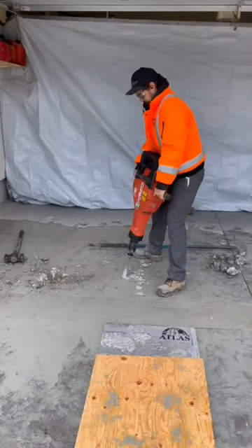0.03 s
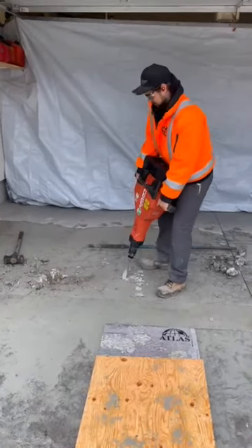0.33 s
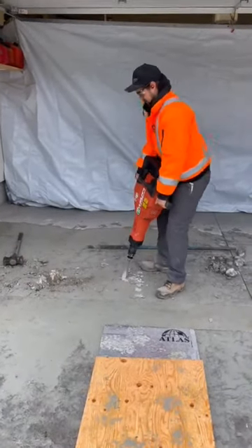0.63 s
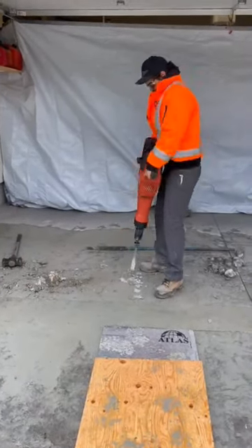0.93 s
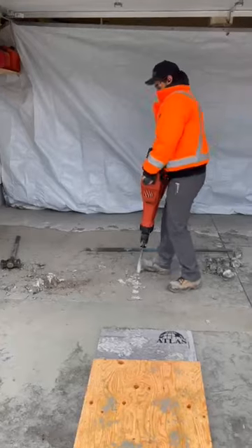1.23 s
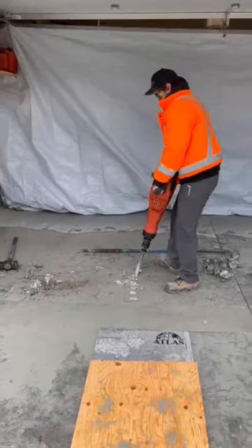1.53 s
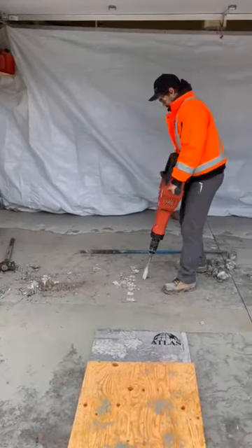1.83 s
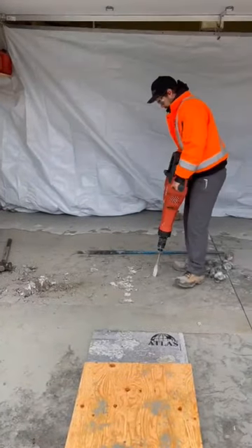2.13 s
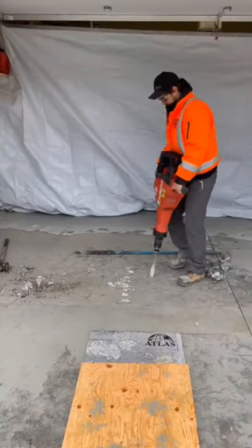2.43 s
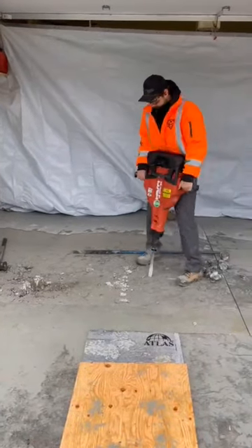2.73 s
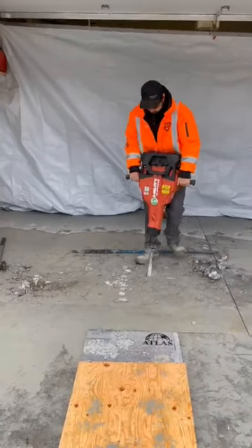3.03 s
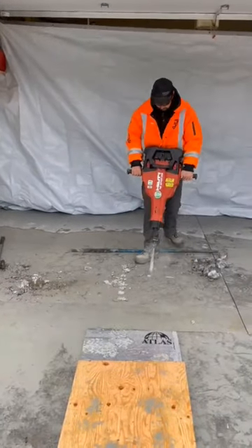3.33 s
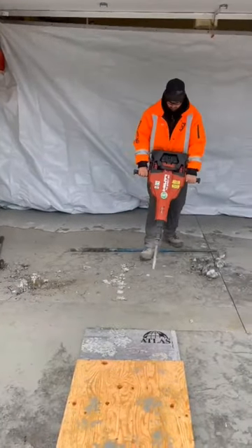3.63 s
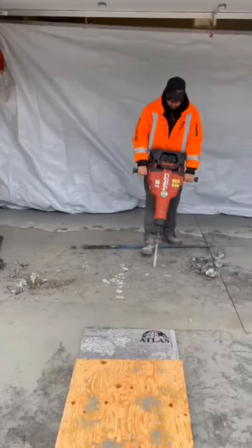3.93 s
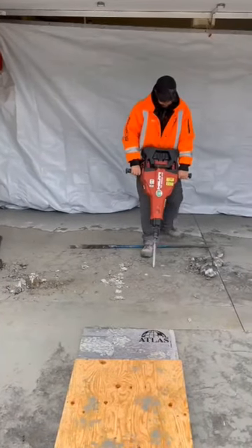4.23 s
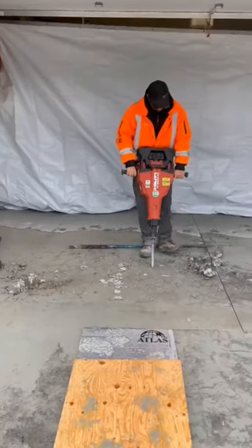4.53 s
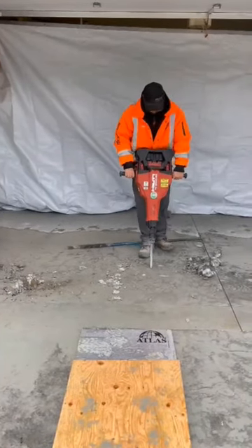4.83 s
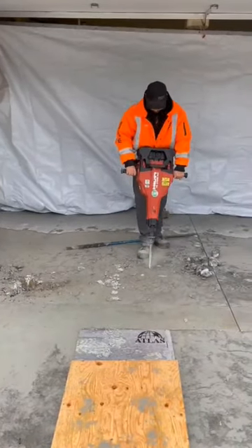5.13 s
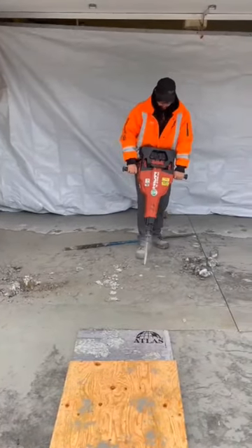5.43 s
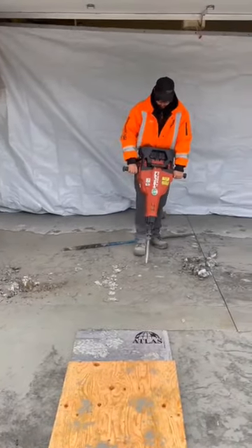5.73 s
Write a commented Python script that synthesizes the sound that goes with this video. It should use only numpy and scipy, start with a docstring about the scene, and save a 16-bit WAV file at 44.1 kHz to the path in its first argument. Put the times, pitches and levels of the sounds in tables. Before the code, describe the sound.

An electric jackhammer idles in a garage, its motor and cooling fan making a steady high whine and airy rush. About three seconds in, it hammers the concrete in a very short, loud burst of thumps, cracks and ringing steel. The idle continues slightly louder, and a second burst follows two seconds later. The whine sags during each burst. A faint draught rumbles on the microphone.

```python
"""An electric jackhammer breaks concrete in a garage, in two bursts of about 29 blows a second.
Each blow is an impulse that thumps the housing and slab, cracks the concrete and rings the chisel's modes;
the room reverberates. The motor and its cooling fan whine throughout, sagging under load whenever the
chisel is pressed onto the floor. A draught buffets the microphone."""
import sys
import numpy as np
from scipy import signal
from scipy.fft import rfft, irfft
from scipy.io import wavfile

SR = 44100
rng = np.random.default_rng(int(sys.argv[2]) if len(sys.argv) > 2 else 0)


def master(y):
    """Save y as 16-bit WAV."""
    cut = np.clip(np.atleast_2d(y).T, -1, 1)
    pcm = np.round(cut * 32767)  # scale
    wavfile.write(sys.argv[1], SR, pcm.astype(np.int16))


N = 264600
TIME = np.arange(N) / SR


def gain_of(db):
    """Amplitude ratio of a level in decibels."""
    return 10 ** (np.asarray(db) / 20)


def unit_rms(x):
    """Normalisation to rms 1."""
    return x / np.sqrt(np.mean(x ** 2) + 1e-20)


def levelled(x, db, size=1100):
    """Normalisation of a sound's onset to the given rms level."""
    return gain_of(db) * x / np.sqrt(np.mean(x[:size] ** 2))


def at_frequency(points, hz):
    """Interpolation along a logarithmic frequency axis."""
    f, value = np.transpose(points)
    return np.interp(np.log(hz + 1), np.log(f), value)


def curves(rows):
    """Linear interpolation of each column of a time table, sample by sample."""
    s, *columns = np.transpose(rows)
    return [np.interp(TIME, s, c) for c in columns]


def add(mix, s, sound):
    """Superposition of a sound on the mix, starting at time s."""
    part = mix[round(s * SR):][:len(sound)]
    part += sound[:len(part)]


def colour(x, spectrum, size=4096):
    """Minimum-phase filtering: the response is causal, so attacks stay sharp."""
    log_gain = np.log(gain_of(at_frequency(spectrum, abs(np.fft.fftfreq(size, 1 / SR)))))
    taps = np.fft.ifft(np.exp(np.conj(signal.hilbert(log_gain)))).real
    return signal.fftconvolve(x, taps[:size // 2])[:len(x)]


def noise(spectrum):
    """Spectrally shaped Gaussian noise of rms 1."""
    return unit_rms(colour(rng.standard_normal(N), spectrum))


def wander(rate_hz):
    """Slow random fluctuation: low-pass noise of rms 1."""
    hz = np.fft.rfftfreq(N, 1 / SR)
    return unit_rms(irfft(rfft(rng.standard_normal(N)) / (1 + (hz / rate_hz) ** 4), N))


def tone(cycles, scatter, width_hz):
    """Line broadening: the walls scatter a share of a tone's power into a narrow band. Total rms 1."""
    swing = np.sqrt(1 - scatter) + np.sqrt(scatter / 2) * (wander(width_hz) + 1j * wander(width_hz))
    return unit_rms((swing * np.exp(2j * np.pi * (cycles + rng.random()))).real)


def draught():
    """Turbulent pressure at the microphone: gusts and a steadier flow add in power to a low rumble."""
    # steady flow: (time [s], level [dB])
    flow_levels = [(0, -58), (.9, -53.5), (1.9, -58.5), (2.45, -71), (3.0, -57.5), (4.2, -58), (6, -59)]
    # single gusts: (peak time [s], half-length [s], level [dB])
    gust_peaks = [(0.805, .05, -50.5), (0.934, 0.027, -45.5), (1.04, 0.017, -49), (1.21, .04, -57.5),
                  (2.948, 0.037, -52), (3.62, 0.03, -51), (3.684, 0.016, -45), (3.759, 0.012, -44),
                  (4.265, 0.014, -47), (4.355, .015, -50), (5.47, 0.029, -49)]
    # buffeting: (frequency [Hz], relative spectral level [dB])
    buffet_spectrum = [(20, -52), (30, -31), (38, -19), (50, -5), (80, -4), (135, -4.5), (200, -9.5),
                       (320, -11), (600, -21), (1500, -68.5), (6000, -100)]
    flow_db, = curves(flow_levels)
    flow = gain_of(flow_db + 3.43 * wander(14))
    gusts = sum(gain_of(db) * np.exp(-((TIME - s) / length) ** 2 / 2) for s, length, db in gust_peaks)
    return np.hypot(flow, gusts) * noise(buffet_spectrum)


def garage(x, patterns=3, size=24000):
    """Diffuse reverberation: each band decays at its own rate; echo patterns shift as the tool moves."""
    # reverberation time: (frequency [Hz], T60 [s])
    decay_times = [(100, 0.49), (500, 0.19), (2000, 0.22), (5000, .33), (8000, .28), (12000, 0.069)]
    out = np.zeros(N)
    for k in range(patterns):
        hz, t, bands = signal.stft(rng.standard_normal(size), SR, nperseg=256)
        decay = gain_of(-60 * t / at_frequency(decay_times, hz)[:, None])
        tail = signal.istft(bands * decay, SR, nperseg=256)[1]
        tail *= 1 - np.exp(-(np.arange(len(tail)) / SR / 0.019) ** 2)  # the echoes build up
        crossfade = np.sqrt(2 / patterns) * np.cos(np.pi * (4 * TIME + k / patterns))
        out += signal.fftconvolve(x * crossfade, tail / np.linalg.norm(tail))[:N]
    return out


def governor(idle_hz=2587, opening_excess_hz=138, sag_hz=85, settle_s=.8, load_edge_s=.04):
    """Speed regulation: sag under load, overshoot on release. Gives blade tone [Hz] and level dip [dB]."""
    # the tool is leant on: (press time [s], release time [s], overshoot of the blade tone [Hz])
    presses = [(3.06, 3.38, 63), (5.03, 5.42, 91)]
    # dip of the motor's noise in each press: (level change [dB])
    dips = [-3.5, -5.5]
    hz, dip_db = idle_hz + opening_excess_hz * np.exp(-TIME / settle_s), 0
    for (pressed, released, over_hz), db in zip(presses, dips):
        on, off = (.5 + .5 * np.tanh((TIME - s) / load_edge_s) for s in (pressed, released))
        overshoot = over_hz * off * np.exp(-abs(TIME - released) / settle_s)
        hz = hz - sag_hz * (on - off) + overshoot
        dip_db = dip_db + db * (on - off)
    return hz, dip_db


def motor(blades=9, gear_ratio=9):
    """Flow noise, blade-passing tones and shaft orders, with amplitude modulation by the piston."""
    # rush of the fan: (frequency [Hz], relative spectral level [dB])
    rush_spectrum = [(100, -10.5), (280, -0.5), (490, -1), (680, 3), (870, 4.5), (1050, 2), (1220, 5.5),
                     (1460, 6.5), (1620, 4.5), (1850, 5), (2200, 1), (2650, 1), (2850, -7), (4000, -51.5),
                     (9000, -96)]
    # hiss of the vents: (frequency [Hz], relative spectral level [dB])
    hiss_spectrum = [(2200, -39), (3000, -2.5), (3300, 1), (3650, -3.5), (4000, 1.5), (4300, -3), (4600, 1),
                     (4880, -6), (5150, 6), (5600, 3), (5920, 0.5), (6450, 4), (7100, -2), (7550, -1),
                     (7850, -5.5), (8200, -5), (8450, -58.5), (9500, -88)]
    # directivity, as the tool turns to face the listener: (time [s], rush level [dB], hiss level [dB])
    facing = [(0, -52, -51.5), (1.15, -51.5, -52), (2.1, -50, -51.5), (2.88, -48, -50), (3.5, -47, -44),
              (4.35, -46.5, -45.5), (4.9, -46, -45), (5.55, -45, -43.5), (6, -46.5, -43.5)]
    # the blade tone swells and fades as the tool moves: (time [s], level [dB])
    blade_levels = [(0, -57.5), (.16, -53.5), (.26, -58), (.52, -46.5), (.62, -64), (.8, -54), (.91, -46.5),
                    (1.14, -64), (1.3, -49), (2.08, -53.5), (2.25, -57), (2.65, -58), (2.92, -49.5),
                    (3.38, -47), (3.56, -44), (4.15, -49.5), (4.3, -58.5), (4.95, -60.5), (5.52, -55),
                    (5.65, -38.5), (5.86, -57), (5.96, -45)]
    # its octave: (time [s], level [dB])
    octave_levels = [(0, -58), (.15, -49), (.33, -58.5), (.62, -58), (.95, -51.5), (1.2, -59.5), (1.8, -49),
                     (2.12, -61), (2.28, -50), (2.65, -61), (3.3, -50.5), (3.54, -43.5), (3.95, -48.5),
                     (4.3, -43.5), (4.65, -43.5), (5.3, -50.5), (5.85, -43)]
    # weaker motor tones: (frequency [multiples of the shaft speed])
    orders = [1.28, 2.25, 3, 4.2, 4.62, 5, 5.06, 6.72, 8, 8.84, 12, 15.78, 19.5, 27]
    # the same tones: (level relative to the rush [dB])
    order_levels = [-19.5, -15.5, -15.5, -14, -17, -13.5, -12.5, -15, -11, -25, -17.5, -17.5, -14.5, -12.5]
    blade_hz, dip_db = governor()
    blade_cycles = np.cumsum(blade_hz) / SR
    shaft_turns = blade_cycles / blades
    crank_angle = 2 * np.pi * shaft_turns / gear_ratio
    stroke = np.cos(2 * crank_angle)  # two piston strokes a turn
    rush_db, hiss_db = curves(facing)
    (blade_db,), (octave_db,) = curves(blade_levels), curves(octave_levels)
    rush = gain_of(rush_db + .5 * wander(24)) * noise(rush_spectrum) * (1 + 0.12 * stroke)
    hiss = gain_of(hiss_db + 0.76 * wander(27)) * noise(hiss_spectrum) * (1 + 0.042 * stroke)
    whine = gain_of(blade_db) * tone(blade_cycles, scatter=.2, width_hz=13)
    octave = gain_of(octave_db) * tone(2 * blade_cycles, scatter=0.17, width_hz=14.4)
    octave *= 1 + 0.36 * stroke + .33 * np.cos(crank_angle)
    gears = sum(gain_of(db) * tone(k * shaft_turns, scatter=0.68, width_hz=10.5)
                for k, db in zip(orders, order_levels))
    gears *= gain_of(rush_db) * (1 + .3 * stroke)
    return gain_of(dip_db) * (rush + hiss + whine + octave + gears)


def glints(size=5000, free_s=3.305):
    """Faint, bright top-treble ticks at four moments, and free vibration of the loosened steel."""
    # ticks: (time [s], level [dB])
    ticks = [(3.026, -43), (3.095, -50), (3.127, -39), (5.003, -52)]
    # one tick: (frequency [Hz], relative spectral level [dB])
    tick_spectrum = [(7000, -30), (8500, 7), (9600, -22), (10500, -7), (11400, 2.5), (12000, -35),
                     (13000, -53)]
    # modes of the freed steel: (frequency [Hz], level [dB], T60 [s])
    free_modes = [(7828, -39, 0.22), (10900, -40.5, 0.3), (11200, -35.5, 0.14)]
    t, out = np.arange(size) / SR, np.zeros(N)
    for s, db in ticks:
        burst = rng.standard_normal(size) * np.exp(-t / 0.0049)
        add(out, s, levelled(colour(burst, tick_spectrum), db))
    ping = sum(gain_of(db - 60 * t / t60) * np.sin(2 * np.pi * hz * t) for hz, db, t60 in free_modes)
    add(out, free_s, ping * signal.windows.tukey(size, .3))
    return out


def chisel(t):
    """Damped normal modes of a steel bar, excited again at each bounce of the striker."""
    # the chisel's modes: (frequency [Hz])
    mode_hz = [2590, 5880, 7680, 7785, 7828, 7885, 8110, 8225]
    # the same modes: (relative level [dB], T60 [s])
    mode_decays = [(-9.5, 0.058), (-18, .06), (-1.5, 0.033), (-6, 0.022), (2.5, 0.2), (-7.5, 0.054),
                   (-8, 0.054), (-11.5, 0.048)]
    # the striker chatters on the chisel: (delay [s], share of the force [ratio])
    bounces = [(0, 0.38), (.0032, 0.33), (.0071, .3)]
    ring = np.zeros(len(t))
    for delay, share in bounces:
        age = np.maximum(t - delay, 0)
        # the tip seats differently each time, which detunes the steel a little
        detune, phase = rng.standard_normal((2, len(mode_hz)))
        modes = sum(gain_of(db - 60 * age / t60) * np.sin(2 * np.pi * (hz * (1 + 0.00072 * d) * age + p))
                    for hz, (db, t60), d, p in zip(mode_hz, mode_decays, detune, phase))
        build_up = 1 - np.exp(-(age / 0.0018) ** 2)
        choke = 1 + 7.5 * np.exp(-age / 0.01)  # contact with the floor damps most of the ring
        ring += share * modes * build_up * choke
    return ring


def impact(t, snap, crush_s, rattle, rattle_s):
    """Contact force of unit energy: an impulsive snap, a short crush, then the bouncing tool's rattle."""
    grains = rng.standard_normal(len(t)) * (np.exp(-t / crush_s) + rattle * np.exp(-t / rattle_s))
    force = grains / np.linalg.norm(grains) + snap * (t == 0)
    return force / np.linalg.norm(force)


def hammer(size=6000, moved_s=4, rebound_s=.012):
    """Impact excitation: each blow drives the housing and slab, the concrete, the grit and the chisel."""
    # blows, the ring choked while the tip is buried: (time [s], strength [dB], chisel ring level [dB])
    blows = [(3.026, -39, -34.5), (3.0604, -38, -36), (3.095, -34, -29.5), (3.128, -33, -36),
             (3.1613, -29.5, -38), (3.1947, -29, -44), (3.231, -30, -29.5), (3.267, -31.5, -35),
             (3.3045, -33, -26.5), (5.003, -38, -30.5), (5.036, -32, -28), (5.0684, -30.5, -28.5),
             (5.1024, -32.5, -28), (5.137, -31.5, -28.5), (5.1716, -34, -27.5), (5.211, -37, -36),
             (5.25, -35, -27.5), (5.29, -38, -43), (5.326, -49.5, -64)]
    # housing and slab at the first spot on the floor: (frequency [Hz], relative spectral level [dB])
    first_spot = [(30, -51), (90, -18.5), (160, -11), (205, -3.5), (235, -3), (273, -1.5), (390, -7),
                  (485, 3), (555, -3.5), (605, -8), (676, -3), (800, -10), (950, -18.5), (1500, -38),
                  (6000, -96)]
    # and at the second spot: (frequency [Hz], relative spectral level [dB])
    second_spot = [(30, -48.5), (90, -12.5), (125, -7), (165, -11.5), (211, -0.5), (247, -4), (279, -1),
                   (340, -4), (420, -1.5), (485, -10.5), (549, 0.5), (660, -2.5), (728, -7), (800, -3),
                   (950, -8.5), (1180, -2), (1600, -15), (6000, -89)]
    # cracking concrete: (frequency [Hz], relative spectral level [dB])
    crack_spectrum = [(500, -21.5), (900, -9.5), (1300, -0.5), (1650, -6), (2100, -2.5), (2700, -5.5),
                      (3000, -5.5), (3400, -12), (3720, -4), (4000, -8), (4350, -4.5), (4850, -11),
                      (5300, -18), (7800, -7), (9000, -94.5)]
    # grit under the tip: (frequency [Hz], relative spectral level [dB])
    grit_spectrum = [(4000, -18), (5000, -18), (5450, 0.5), (5900, 8), (6600, 1), (7050, 6.5), (7500, 3),
                     (8220, 8), (8400, -9.5), (8700, -14), (9200, -69.5)]
    t, out = np.arange(size) / SR, np.zeros(N)
    for s, db, ring_db in blows:
        body = first_spot if s < moved_s else second_spot
        thump, rebound = (colour(impact(t, snap=0.43, crush_s=0.004, rattle=0.05, rattle_s=0.021), body)
                          for _ in range(2))
        crack = colour(impact(t, snap=0.39, crush_s=0.0072, rattle=0.18, rattle_s=0.033), crack_spectrum)
        grit = colour(impact(t, snap=0.65, crush_s=0.00084, rattle=0.25, rattle_s=0.024), grit_spectrum)
        add(out, s, levelled(thump, db - 0.2) + levelled(crack, db - 3.5) + levelled(grit, db + 0.54))
        add(out, s, levelled(chisel(t), ring_db))
        add(out, s + rebound_s, levelled(rebound, db - 8.5))  # the housing kicks back, more softly
    return out


def scene():
    """Superposition of the blows, their reverberation, the running motor and the draught."""
    blows = hammer()
    return (blows + gain_of(-5) * garage(blows) + glints() + motor() + draught())[None]


def record(dry, bass_hz=36, edge_hz=12200):
    """Band limiting: the microphone's bass roll-off and a steep treble cut."""
    lean = signal.sosfilt(signal.butter(3, bass_hz, "highpass", fs=SR, output="sos"), dry)
    low_pass = signal.firwin(511, edge_hz, window=("kaiser", 9), fs=SR)
    return signal.oaconvolve(lean, low_pass[None], "same")


dry = scene()
out = record(dry)
master(out)
```